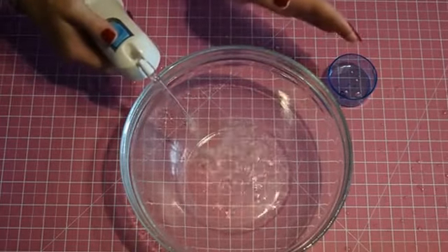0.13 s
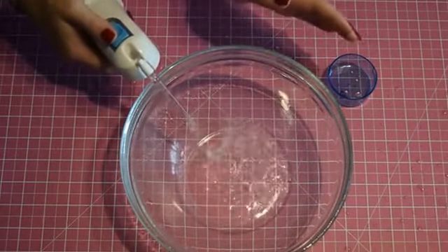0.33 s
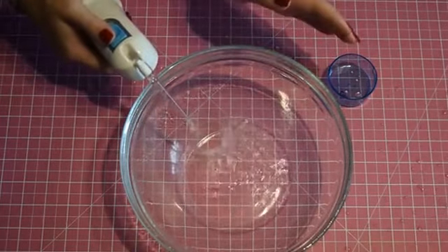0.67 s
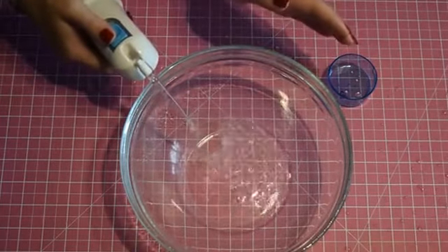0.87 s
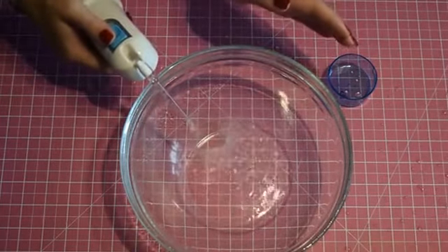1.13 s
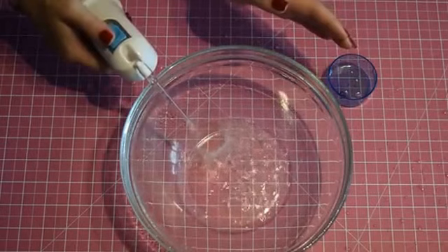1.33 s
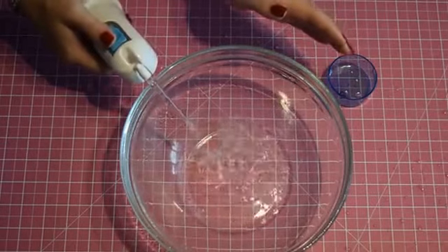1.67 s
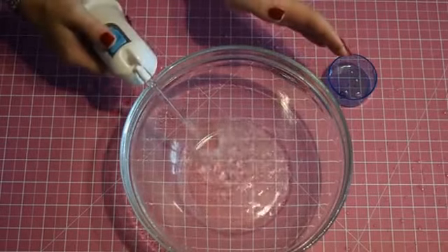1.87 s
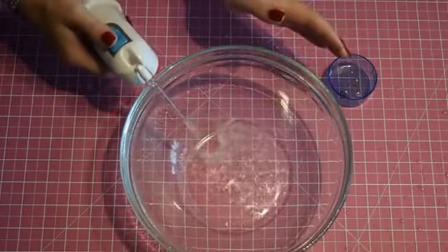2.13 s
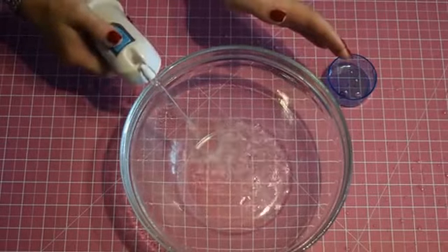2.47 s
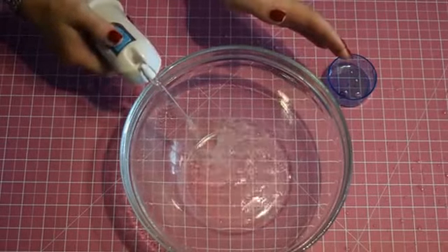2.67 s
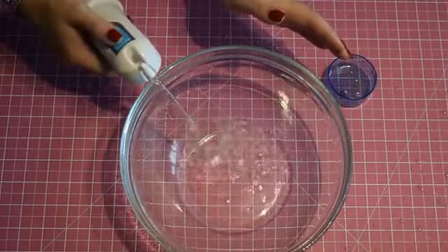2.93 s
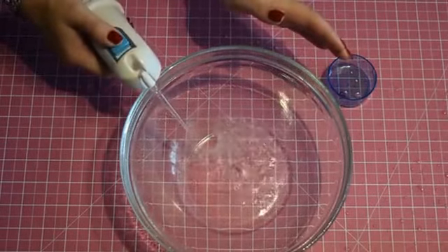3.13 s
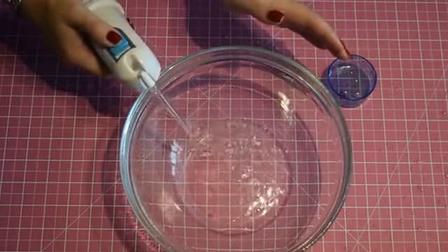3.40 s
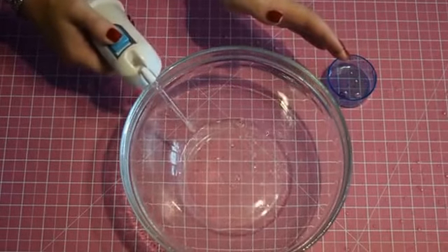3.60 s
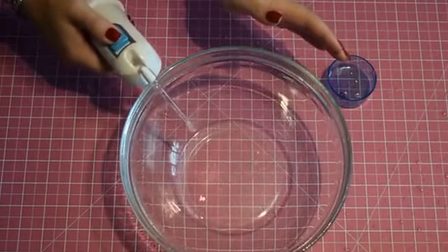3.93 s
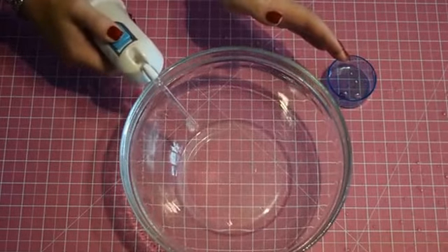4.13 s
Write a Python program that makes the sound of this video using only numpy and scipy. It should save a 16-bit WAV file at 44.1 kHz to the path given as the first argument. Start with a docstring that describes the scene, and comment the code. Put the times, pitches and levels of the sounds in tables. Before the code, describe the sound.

From the very start a handheld water flosser is already running, close to the microphone in a small, fairly dry room. Its piston pump makes a rough, rapid buzz, about 34 pulses per second and wavering slightly, with midrange plastic knocking and brighter valve chirps. Locked to it, a pulsing jet spatters into shallow water in a glass bowl: dense, bright, grainy splashing, fine high mist, and small bubble plinks and very high pings. The bowl gives a hollow, glassy colour. Faint dull handling bumps lie underneath. The knocking swells a little towards 2.4 s, then the valves weaken. At about 3.3 s the motor is cut; pitch drops quickly, water drums briefly on the glass side and everything dies by 3.5 s. Quiet foam fizz fades over faint room noise. Around 4.0 s small plastic ticks lead to a sharp, loud snap at 4.07 s, then tiny drips and soft rustling to the end.

```python
"""A hand-held water flosser sprays into a glass bowl on a table, up close in a small room.
Its piston knocks twice a turn in the plastic body, as short tones that swell and die; its valves and
water line ring at their own moments of each turn. Each stroke throws a slug of water: random droplet
impacts, coloured as spatter and mist, ring the bowl, and bubbles ping and plink as rising sine tones.
The pump winds down, foam fizzes, a sharp plastic click snaps in the quiet and a soft rustle follows."""
import sys
import numpy as np
from scipy import signal
from scipy.fft import rfft, irfft
from scipy.io import wavfile

SR = 44100
rng = np.random.default_rng(int(sys.argv[2]) if len(sys.argv) > 2 else 0)


def to_wav(sig):
    """Store sig (one row per channel, or 1-D mono) as 16-bit WAV at the path in sys.argv[1].

    Samples outside -1..1 are clipped; the rate is SR.
    """
    pcm = np.clip(np.atleast_2d(sig), -1, 1) * 32767
    pcm = np.round(pcm).astype(np.int16)
    wavfile.write(sys.argv[1], SR, pcm.T)  # frames by channels


N = 188571  # length in samples
T = np.arange(N) / SR  # time in seconds


def undb(db):
    """Decibels to gain."""
    return 10 ** (np.asarray(db) / 20)


def unit(x):
    """Scale to rms 1."""
    return x / np.sqrt(np.mean(x ** 2))


def since(s):
    """Seconds gone by since time s, zero before it."""
    return np.maximum(T - s, 0)


def fade(t, t60):
    """Exponential decay, 60 dB down after t60."""
    return np.exp(-np.log(1000) * t / t60)


def add(out, s, sound):
    """Mix a short sound in at time s."""
    i = int(np.clip(s * SR, 0, N - 1))
    out[i:i + len(sound)] += sound[:N - i]


def stereo(mid, side):
    """Left and right from what they share and what differs."""
    return np.array([mid + side, mid - side])


def colour(x, points):
    """Causal minimum-phase filter whose gain follows (frequency [Hz], level [dB]) points."""
    hz, db = np.transpose(points)
    size = 2 * N
    f = np.maximum(np.fft.rfftfreq(size, 1 / SR), 1)
    log_gain = np.log(undb(np.interp(np.log(f), np.log(hz), db)))
    # folding the cepstrum onto positive times makes the filter causal
    cepstrum = irfft(log_gain)
    cepstrum[1:N] *= 2
    cepstrum[N + 1:] = 0
    response = np.exp(rfft(cepstrum))
    return irfft(rfft(x, size) * response)[..., :N]


def resonate(x, hz, width_hz):
    """One resonance, gain 1 at its centre."""
    return signal.lfilter(*signal.iirpeak(hz, hz / width_hz, fs=SR), x)


def ring(x, modes):
    """Drive a set of (frequency [Hz], width [Hz], level [dB]) resonances."""
    return sum(undb(db) * resonate(x, hz, width) for hz, width, db in modes)


def impacts(per_s, spread_db):
    """Random impacts of uneven size and either sign, rms 1."""
    hit = rng.random(N) < per_s / SR
    sign = rng.choice([-1, 1], N)
    size = undb(spread_db * np.clip(rng.standard_normal(N), -2, 2))
    return unit(hit * sign * size)


def burst(turns, at, length):
    """A quick rise and slower fall once a turn, starting at a given part of the turn."""
    age = (turns - at) % 1 / length
    return age * np.exp(1 - age)


def bubble(hz, cycles, glide):
    """A bubble rings for some cycles and rises in pitch by the share glide."""
    t = np.arange(int(cycles / hz * SR)) / SR
    life = t * hz / cycles
    tone = np.sin(2 * np.pi * hz * t * (1 + glide * life / 2))
    onset = 1 - np.exp(-t * hz / 2)
    return tone * fade(life, 1) * onset


def ringing(turns, rings, detune=0.03, scatter_db=2, late_s=0.000702):
    """Short rings swell and die at their own part of every turn, scattered in time, pitch and level."""
    out = np.zeros(N)
    for at, hz, length_s, db in rings:
        t = T[:int(length_s * SR)]
        swell = np.sin(np.pi * t / length_s) ** 2
        moments = T[np.flatnonzero(np.diff(np.floor(turns - at)) > 0)]
        for s, (late, pitch, size, phase) in zip(moments, rng.standard_normal((200, 4))):
            tone = np.sin(2 * np.pi * (hz * (1 + detune * pitch) * t + phase))
            level = undb(db + scatter_db * size)
            # each swell is centred on its moment
            add(out, s - length_s / 2 + late_s * late, level * swell * tone)
    return out


# the motor is cut, then coasts to a stop
OFF_S, COAST_S = 3.33, .22
START_TURN = .25  # part of a turn
# the pump's wavering speed under power: (time [s], speed [turns per second])
PUMP_SPEED = [(0, 32.61), (.17, 34.86), (.42, 32.93), (.68, 35.02), (1.03, 33.43), (1.3, 34.31),
              (1.5, 33.55), (1.7, 32.64), (2.0, 34.12), (2.35, 33.28), (2.8, 33.62), (3.1, 34.5),
              (3.33, 33.3)]


def rotation():
    """Turns of the pump so far: it runs, then friction slows it evenly."""
    coasting = np.maximum(1 - since(OFF_S) / COAST_S, 0)
    speed = np.interp(T, *np.transpose(PUMP_SPEED)) * coasting
    return START_TURN + np.cumsum(speed) / SR


# the piston's rings: (moment [part of a turn], frequency [Hz], length [s], relative level [dB])
PISTON_RINGS = [(.41, 1605, .012, .5), (.53, 1700, .008, -8), (.96, 1585, .011, -1), (.06, 830, .011, -20),
                (.43, 860, .011, -18), (.73, 890, .013, -20)]
# resonances of the pump body: (frequency [Hz], width [Hz], relative level [dB])
BODY_MODES = [(858, 120, -6), (1521, 290, -1.5)]


def pump(turns, rattle_db=-16):
    """The piston rings the body at both ends of its travel, over the rattle of the gears."""
    strokes = ringing(turns, PISTON_RINGS, detune=.021, scatter_db=2, late_s=.0005)
    shaken_body = ring(impacts(5000, 3.7), BODY_MODES)
    rattle = colour(shaken_body, [(200, -36.5), (700, -2.5), (2400, 5), (6000, -24.0)])
    return strokes + undb(rattle_db) * unit(rattle)


# rings of the valves and water line as the pressure rises and falls:
# (moment [part of a turn], frequency [Hz], length [s], relative level [dB])
VALVE_RINGS = [(.05, 2991, .013, -3.5), (.38, 3340, .011, 0.5), (.43, 4310, .011, -8),
               (0.549, 1277, .014, -15), (.6, 2872, .015, -2.5), (0.972, 2271, .016, 0)]


def valves(turns):
    """Pressure changes ring the valves and water line at their own moments of each turn."""
    return ringing(turns, VALVE_RINGS, detune=0.027, scatter_db=2.0)


def slugs(turns, tail_share=0.87, uneven_db=4.5):
    """Water arriving each turn: a slug's head, then its broken tail, at a random strength per slug."""
    turn_number = np.maximum(turns - .29, 0).astype(int)
    strength = undb(uneven_db * rng.standard_normal(200))[turn_number]
    head = burst(turns, .29, .09)
    tail = burst(turns, .53, .085)
    return strength * (head + tail_share * tail)


def refill(turns, dip=0.14):
    """The spray thins once a turn while the piston draws in water."""
    drawing = np.exp(-((turns % 1 - .21) / .1) ** 2)
    return 1 - np.clip(dip, 0, 1) * drawing


# tone of the spatter on water: (frequency [Hz], relative level [dB])
SPATTER_COLOUR = [(150, -52), (330, -31.5), (500, -22.5), (700, -6), (850, -1), (1080, -6.5), (1350, 1),
                  (1600, 5.5), (1930, -.5), (2250, 3), (2600, 3.5), (3200, 3), (4600, -3.5), (7000, -4),
                  (12000, -36.5)]
# resonances of the bowl's bare side: (frequency [Hz], width [Hz], relative level [dB])
SIDE_MODES = [(770, 110, -12), (1560, 120, 0), (1852, 40, 5.5), (2070, 80, 0), (3950, 560, -1.5)]


def splash(slug, short, side_db=1.5):
    """Drops hit shallow water, harder with each slug; a share drums louder on the bowl's bare side."""
    on_water, on_side = (impacts(5000, 3.5) * (1 + 0.17 * slug) for _ in range(2))
    spatter = unit(colour(on_water, SPATTER_COLOUR))
    drumming = undb(side_db) * unit(ring(on_side, SIDE_MODES))
    return np.sqrt(1 - short) * spatter + np.sqrt(short) * drumming


# left-right difference added to the spatter: (frequency [Hz], gain [dB])
SPATTER_DIFFERENCE = [(200, -14), (500, -9.5), (750, -21), (1600, -15.5), (1950, -24), (2350, -9.5),
                      (3000, -45), (4000, -61), (5300, -16), (7500, -31)]


def splash_difference(slug, short, spray_db):
    """A faint left-right difference, uneven over frequency, is added to the spatter."""
    return colour(splash(slug, short) * undb(spray_db), SPATTER_DIFFERENCE)


# tone of the fine mist: (frequency [Hz], relative level [dB])
MIST_COLOUR = [(2500, -32.5), (5000, -24), (7000, 10), (7900, 7), (8600, 14), (9800, 8.5), (10200, 7),
               (11200, 4.5), (12500, -0.5), (13500, -36.5)]


def mist(slug):
    """Fine droplets fizz with each slug, with a left-right difference set by frequency."""
    mid, side = (colour(impacts(4500, 3.5) * (1 + 0.4 * slug), MIST_COLOUR) for _ in range(2))
    side = colour(side, [(6000, -14), (7600, -18), (9000, -11), (12000, -6)])
    return unit(stereo(mid, side))


def plinks(per_s=70, low_hz=2000, high_hz=3700, cycles=26, spread_db=4, plink_db=-1.5):
    """Air trapped by the spatter rings as short, scattered bubbles."""
    out = np.zeros(N)
    for when, pitch, size in rng.random((int(per_s * N / SR), 3)):
        # most bubbles are small, a few stand out
        size_db = spread_db * min(-np.log(1 - size), 2)
        hz = low_hz * (high_hz / low_hz) ** pitch
        add(out, when * N / SR, undb(plink_db + size_db) * bubble(hz, cycles, 0.027))
    return out


# loudest bubble pings: (time [s], peak level [dB])
LOUD_PINGS = [(0.4835, -14), (1.0911, -11), (1.1223, -13), (1.328, -12), (1.3853, -16), (2.165, -9),
              (2.2535, -14), (1.6218, -12), (2.3748, -14), (2.431, -12.5), (2.5503, -16), (2.7636, -12)]


def pings(turns, mist_db, ping_hz=8600, ping_db=9.5, cycles=45):
    """Each slug drives a tiny bubble under the surface; a few more ring out loudly."""
    out = np.zeros(N)
    landings = np.flatnonzero(np.diff(np.floor(turns - .38)) > 0)
    for i, (late, pitch, size) in zip(landings, rng.standard_normal((len(landings), 3))):
        size_db = 5 * min(size, 1.5)
        ping = bubble(ping_hz * (1 + .025 * pitch), cycles, 0.014)
        add(out, T[i] + 0.00092 * late, undb(mist_db[i] + ping_db + size_db) * ping)
    ping = bubble(ping_hz, cycles, 0.024)
    for s, db in LOUD_PINGS:
        add(out, s, undb(db) * ping / ping.max())
    return out


# ringing of the bowl and the air in it: (frequency [Hz], lift [dB])
BOWL_LIFTS = [(738, 5), (836, 5), (1031, 4.5), (1236, 4), (1343, 4), (1400, 6), (1498, 8), (1553, 6),
              (1585, 7.5), (1627, 2), (1720, 3.5), (1783, 6), (1849, 5), (2054, 5), (2108, 5), (2165, 7.5),
              (2264, 2.5), (2342, 7.5), (2407, 3), (2765, 7), (2986, 4), (3303, 5), (3612, 4), (3773, 6)]
# where reflections off the bowl and table cancel: (frequency [Hz], cut as negative gain [dB])
HOLLOWS = [(793, -6.5), (1007, -8), (1383, -6), (1537, -13), (1797, -7), (1905, -7.5), (2206, -5.5),
           (2375, -11), (2451, -4.5), (2615, -5), (2779, -7.5), (3095, -6), (3180, -4), (3252, -9),
           (3415, -6), (3473, -5), (4070, -6)]
# long rings of the glass: (frequency [Hz], width [Hz], level [dB])
GLASS_MODES = [(1238, 0.86, -3), (2260, 2.2, -9)]


def bowl(x, ring_width_hz=14):
    """The bowl lifts its own tones and hollows out others; its glass rings on a little longer."""
    for hz, db in BOWL_LIFTS + HOLLOWS:
        gain = undb(db)
        # deeper hollows are wider
        x = x + (gain - 1) * resonate(x, hz, ring_width_hz / min(gain, 1))
    return x + ring(x, GLASS_MODES)


EMPTY_S = 3.3715  # the pressure is gone
FOAM_DB, FOAM_T60_S = -34, 0.37
# resonances of the fizzing foam: (frequency [Hz], width [Hz], relative level [dB])
FOAM_MODES = [(2200, 160, -2), (3800, 600, 0)]


def foam():
    """Small bubbles left by the jet burst and die out."""
    life = (T > EMPTY_S) * fade(since(EMPTY_S), FOAM_T60_S)
    return undb(FOAM_DB) * life * unit(ring(impacts(2000, 2.8), FOAM_MODES))


# last drips: (time [s], starting frequency [Hz], level [dB])
LAST_DRIPS = [(4.119, 1380, -33), (4.130, 1500, -38)]


def drips():
    """Late drips each trap a bubble that rings with a rising pitch."""
    out = np.zeros(N)
    for s, hz, db in LAST_DRIPS:
        add(out, s, undb(db) * bubble(hz, 42, 0.06))
    return out


# contacts of the plastic: (time [s], level before colouring [dB], brightness [dB per octave])
CLICK_CONTACTS = [(3.989, -50, 12.5), (3.994, -49, 8), (4.034, -34.5, -2), (4.053, -47, -5),
                  (4.065, -21, 4), (4.067, -8.5, 1), (4.070, -12.5, -3)]
# tone of a click: (frequency [Hz], gain [dB])
CLICK_COLOUR = [(100, -28), (450, -25), (700, -12), (850, 1), (1050, 2.5), (1550, -6), (2100, -3.5),
                (3600, -10), (4600, -4), (5500, 1), (7400, -2), (9600, -1), (13000, -17)]
# resonances of the clicking plastic: (frequency [Hz], 60 dB decay time [s], relative level [dB])
PLASTIC_MODES = [(948, .07, -2), (1430, .06, -14), (2130, .05, -20), (5340, .14, -11), (5938, .14, -18),
                 (6600, .13, -11), (7460, 0.12, -2), (8559, .14, -18), (9200, .1, -16)]


def clicks(crack_t60=0.0099, ring_db=-25, tail_db=-23, tail_t60=0.26):
    """Hard plastic snaps in several quick contacts, then rattles and rings briefly."""
    cracks, tones, t = np.zeros(N), np.zeros(N), T[:SR // 3]
    tone = sum(undb(db) * np.sin(2 * np.pi * hz * t) * fade(t, t60) for hz, t60, db in PLASTIC_MODES)
    # the brightness tilt pivots at 4 kHz and levels off below 1 kHz
    octaves = np.log2(np.maximum(np.fft.rfftfreq(len(t), 1 / SR), 1000) / 4000)
    for s, db, tilt_db in CLICK_CONTACTS:
        snap = rng.standard_normal(len(t)) * fade(t, crack_t60)
        rattle = impacts(800, 3.1)[:len(t)] * fade(t, tail_t60)
        # a moment of silence in front keeps the attack clean under the tilt
        contact = np.pad(snap + undb(tail_db) * rattle, (SR // 100, 0))[:len(t)]
        tilted = irfft(rfft(contact) * undb(tilt_db * octaves), len(t))
        add(cracks, s - 1 / 100, undb(db) * tilted)
        add(tones, s, undb(db + ring_db) * tone)
    return colour(cracks, CLICK_COLOUR) + tones


RUSTLE_S, RUSTLE_ATTACK_S, RUSTLE_DB = 4.11, 0.05, -51.5
# tone of the rustle: (frequency [Hz], relative level [dB])
RUSTLE_COLOUR = [(400, -23), (950, 0.5), (1400, -9), (2250, 0), (3100, -11), (8000, -31)]


def rustle():
    """A soft rustle of small grains swells after the click and holds."""
    swell = np.minimum(since(RUSTLE_S) / RUSTLE_ATTACK_S, 1)
    return undb(RUSTLE_DB) * swell * unit(colour(impacts(3000, 2.4), RUSTLE_COLOUR))


# soft handling bumps: (time [s], level before the decay [dB])
HANDLING_BUMPS = [(.475, -50), (.695, -57), (1.694, -53), (2.22, -48), (2.715, -53)]


def handling(thud_hz=75, thud_t60=0.089, drag_share=0.47, drag_s=0.0215):
    """Dull bumps of the hand, each dragging on into a second, weaker contact."""
    out, t = np.zeros(N), T[:SR // 4]
    for s, db in HANDLING_BUMPS:
        for late_s, share in ((0, 1), (drag_s, drag_share)):
            noise = rng.standard_normal(len(t))
            thud = unit(resonate(resonate(noise, thud_hz, 106), thud_hz, 106))
            add(out, s + late_s, share * undb(db) * thud * fade(t, thud_t60))
    return out


def room(x, wet_db=-14, t60=0.13, width=0.17):
    """Reflections of a small room, as decaying noise, reach left and right differently."""
    t = T[:SR // 3]
    mid, side = rng.standard_normal((2, len(t))) * fade(t, t60) * (t > .004)
    echo = stereo(mid, width * side) / np.sqrt(np.sum(mid ** 2))
    return x + undb(wet_db) * signal.fftconvolve(x, echo, axes=1)[:, :N]


# tone of the room air: (frequency [Hz], relative level [dB])
AIR_COLOUR = [(25, -6), (70, -18.5), (160, -21), (300, -17.5), (800, -11.5), (1250, -9.5), (2000, -13.5),
              (3500, -21), (8000, -26.5), (13000, -33)]


def air(air_db=-55.5, hum_hz=46, hum_db=-69):
    """Quiet room noise, most diffuse in the bass; a low hum fades once the motor is cut."""
    mid, side = colour(rng.standard_normal((2, N)), AIR_COLOUR)
    side = colour(side, [(60, -1), (300, -10), (1000, -10.5), (4000, -2.5)])
    hum = unit(np.sin(2 * np.pi * hum_hz * T)) * fade(since(OFF_S), COAST_S)
    return undb(air_db) * unit(stereo(mid, side)) + undb(hum_db) * hum


# levels before the jet slackens
SPRAY_DB, MIST_DB, VALVE_DB = -22, -27.5, -22
# ahead of the stop the jet slackens: spray and mist thin out and the valves weaken
SLACKEN_S = 2.48
SPRAY_SLACK_DB_PER_S, MIST_SLACK_DB_PER_S, VALVE_SLACK_DB_PER_S = 0.5, 1.5, 14
# once the pressure is gone these die away, the fine mist fastest
SPRAY_FALL_DB_PER_S, BODY_FALL_DB_PER_S, MIST_FALL_DB_PER_S = 191, 238, 249
# the body's knocking grows slowly and eases again: (time [s], level before the pressure goes [dB])
KNOCKING = [(0, -22), (1.8, -19.5), (2.38, -16.5), (2.7, -20), (3.15, -19), (3.4, -22.5)]
# the weakening jet falls short onto the bowl's side: (time [s], share of the water [0-1])
SHORTFALL = [(3.1, 0.02), (3.27, 0.11), (3.35, 0.4), (3.43, 0)]


def scene():
    """The pump's turning times knocks, spray and slug bubbles; jet and body fade with the pressure."""
    turns = rotation()
    slug = slugs(turns)
    short = np.clip(np.interp(T, *np.transpose(SHORTFALL)), 0, 1)

    slack_s, empty_s = since(SLACKEN_S), since(EMPTY_S)
    spray_db = SPRAY_DB - SPRAY_SLACK_DB_PER_S * slack_s - SPRAY_FALL_DB_PER_S * empty_s
    mist_db = MIST_DB - MIST_SLACK_DB_PER_S * slack_s - MIST_FALL_DB_PER_S * empty_s
    valve_db = VALVE_DB - VALVE_SLACK_DB_PER_S * slack_s - BODY_FALL_DB_PER_S * empty_s
    body_db = np.interp(T, *np.transpose(KNOCKING)) - BODY_FALL_DB_PER_S * empty_s

    machine = pump(turns) * undb(body_db) + valves(turns) * undb(valve_db)
    spray = (splash(slug, short) + plinks()) * refill(turns) * undb(spray_db)
    centre = bowl(machine + spray)
    centre = centre + pings(turns, mist_db) + foam() + drips() + clicks() + rustle() + handling()
    side = splash_difference(slug, short, spray_db) + .5 * handling()
    fine_mist = mist(slug) * np.sqrt(1 - short) * undb(mist_db)
    return room(stereo(centre, side) + fine_mist) + air()


TOP_HZ = 13300


def record(dry):
    """A steep low-pass cuts the highest treble, and the waveform sits slightly off zero."""
    offset = -.0024
    low_pass = signal.ellip(10, .2, 70, TOP_HZ, fs=SR, output="sos")
    return signal.sosfilt(low_pass, dry) + offset


dry = scene()
out = record(dry)
to_wav(out)
```